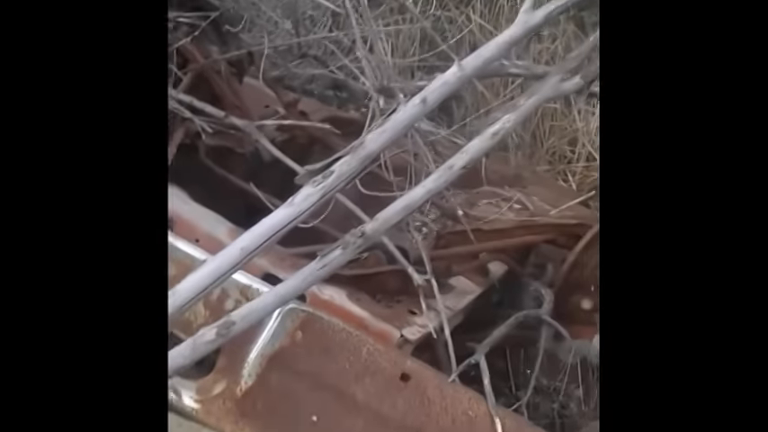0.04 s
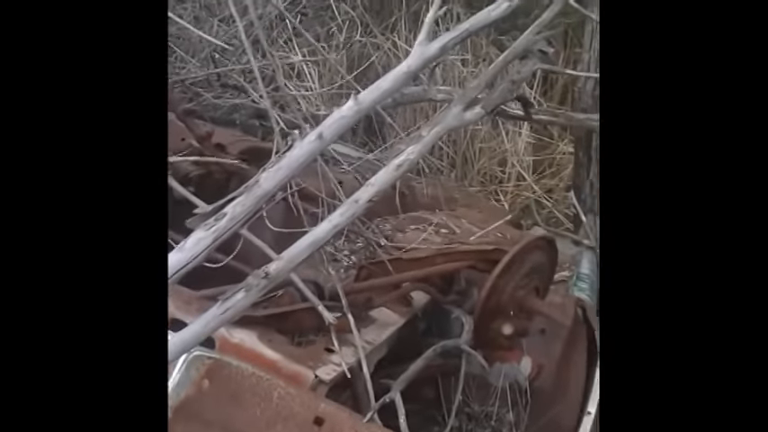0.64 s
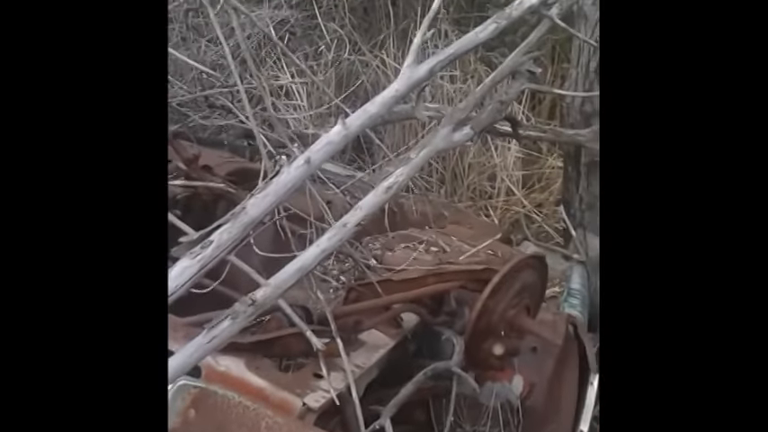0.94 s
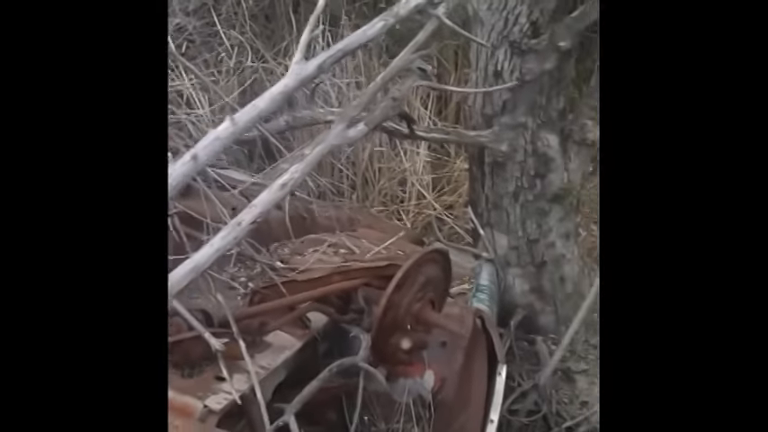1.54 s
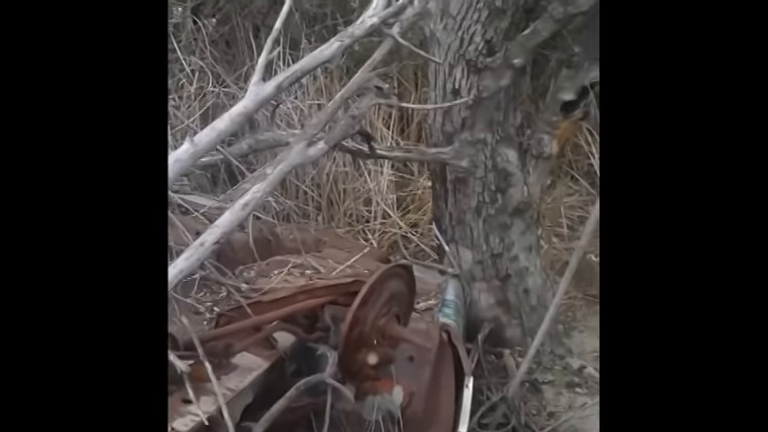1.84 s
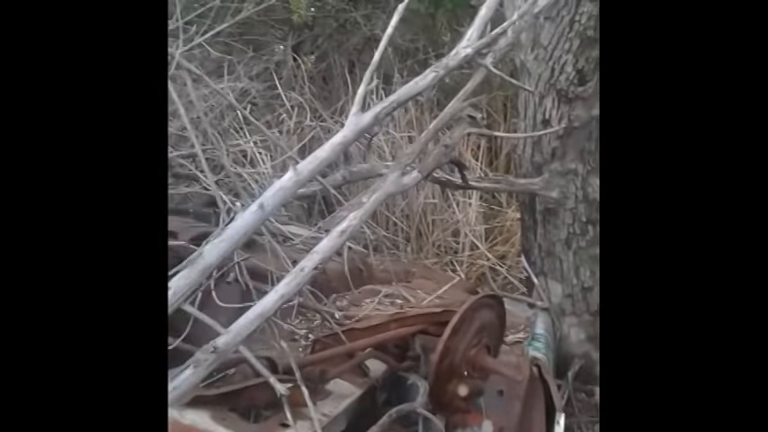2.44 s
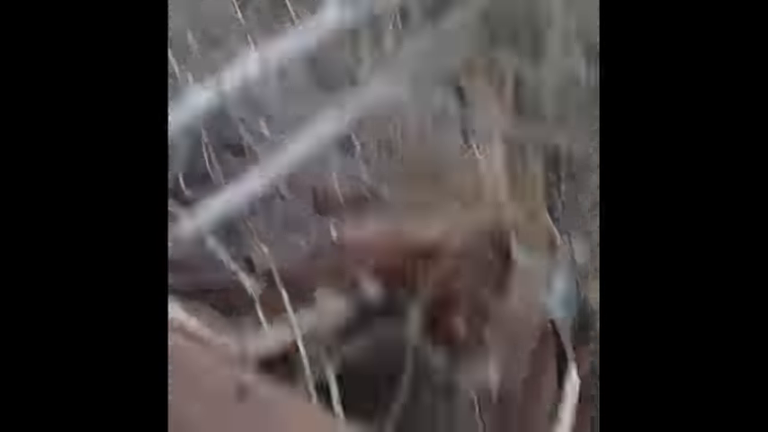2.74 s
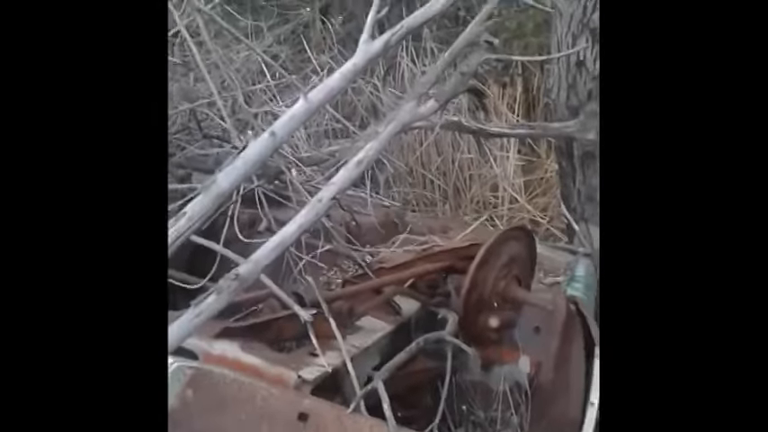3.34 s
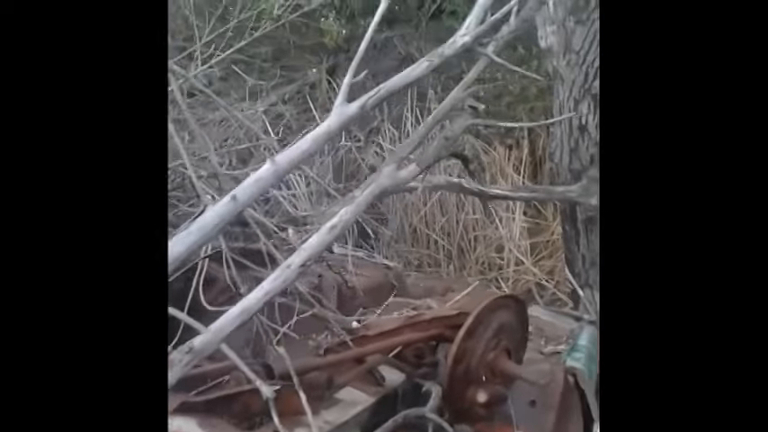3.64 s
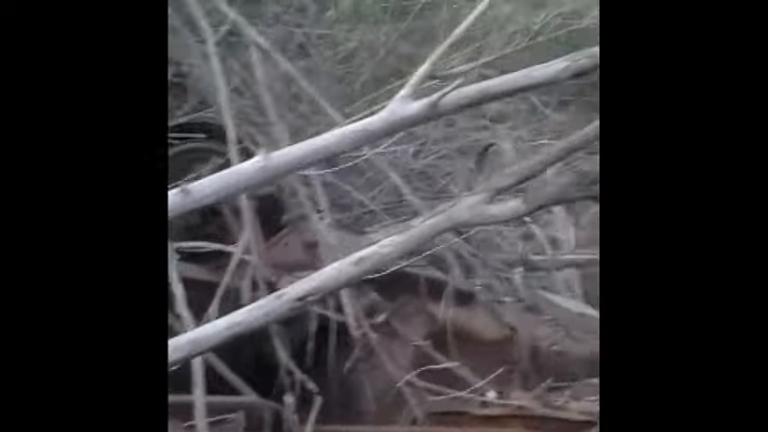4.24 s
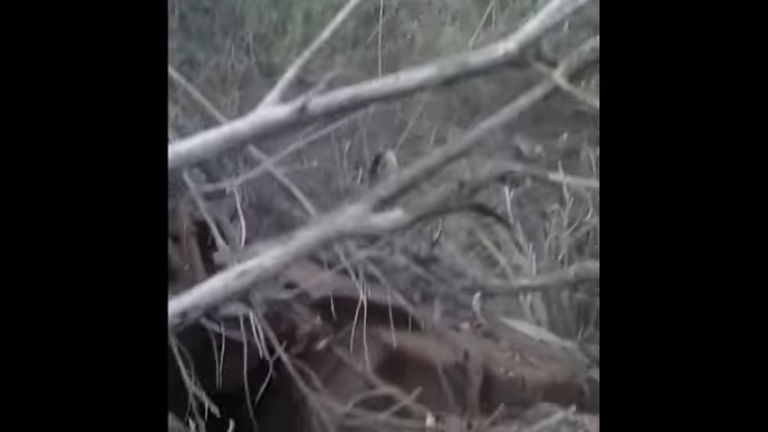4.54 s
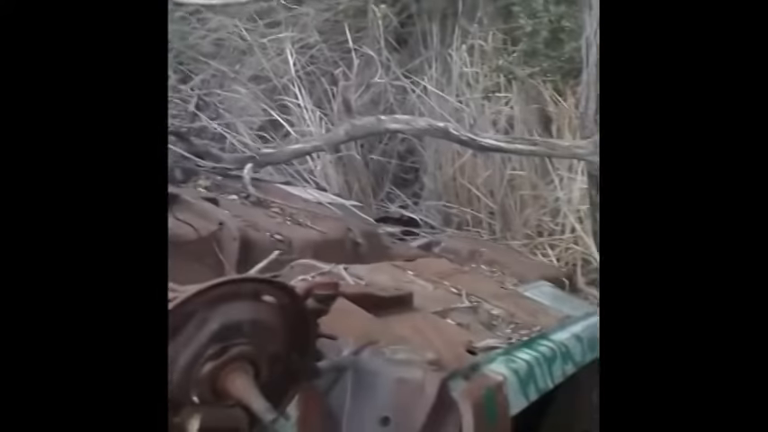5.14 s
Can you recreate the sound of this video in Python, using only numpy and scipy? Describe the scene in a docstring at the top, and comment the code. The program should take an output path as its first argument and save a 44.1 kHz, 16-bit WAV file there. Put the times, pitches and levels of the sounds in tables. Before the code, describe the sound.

Against a faint outdoor hush, careful footsteps stir dry stalks and click a few twigs. About two seconds in, forceful shoves through the brush bring surges of papery crackling, dull thuds and many sharp wooden snaps, close to the microphone and toward the left. Cloth then slides by up close, and the movement ends with a soft step and some small cracks.

```python
"""Someone with a small camera steps through dead brush beside a rusty wreck, in still outdoor air.
First come light swishes of dry stalks, soft footfalls, a few twigs and the faint slide of a sleeve.
From about 2.3 s the shoves grow hard, each swelling, holding and settling: stalks crackle, litter
crunches and twigs snap close by on the left, the loudest overloading the microphone. After 4.2 s
the sleeve hisses past the camera, and a last quiet step breaks a few thin twigs."""
import sys
import numpy as np
from scipy import signal
from scipy.fft import rfft, irfft
from scipy.io import wavfile

SR = 44100
rng = np.random.default_rng(int(sys.argv[2]) if len(sys.argv) > 2 else 0)


def put_to_file(sound):
    """Save the sound as 16-bit audio at rate SR, in the file named by the first command-line argument."""
    columns = np.atleast_2d(sound).T  # one column per channel
    safe = np.clip(columns, -1, 1)
    whole_steps = np.round(safe * 32767)
    wavfile.write(sys.argv[1], SR, whole_steps.astype(np.int16))


N = 237258
TIME = np.arange(N) / SR


def gain_of(db):
    """Decibels to gain."""
    return 10 ** (np.asarray(db) / 20)


def unit_rms(x):
    """Scales to rms 1."""
    return x / np.sqrt(np.mean(x ** 2) + 1e-20)


def curve_at(points, hz):
    """Reads a curve on a log-frequency axis."""
    f, value = np.transpose(points)
    return np.interp(np.log(hz + 1), np.log(f + 1), value)


def add(mix, start, sound):
    """Drops a stereo sound into the mix, start seconds in."""
    part = mix[:, max(round(start * SR), 0):][:, :sound.shape[1]]
    part += sound[:, :part.shape[1]]


def eq(x, points, size=2048):
    """Minimum-phase EQ: shapes the tone with no ringing ahead of an attack."""
    log_gain = np.log(gain_of(curve_at(points, abs(np.fft.fftfreq(size, 1 / SR)))))
    response = np.exp(np.conj(signal.hilbert(log_gain)))
    taps = np.fft.ifft(response).real[:size // 2]
    return signal.oaconvolve(x, taps[None], axes=1)[:, :x.shape[1]]


def resonate(x, hz, q):
    """One resonance with a peak gain of 1."""
    hz = min(hz, SR / 4)
    return signal.lfilter(*signal.iirpeak(hz, max(q, hz / (SR / 4)), fs=SR), x)


def stereo_noise(correlation, size):
    """White noise, wide at correlation 0 and mono at 1."""
    left, other = rng.standard_normal((2, size))
    shared = np.clip(correlation, -1, 1)
    right = irfft(shared * rfft(left) + np.sqrt(1 - shared ** 2) * rfft(other), size)
    return np.array([left, right])


def flicker(hz, depth_db):
    """A randomly wandering gain of rms 1."""
    knots = rng.standard_normal(N)
    return unit_rms(gain_of(depth_db * np.interp(TIME * hz, np.arange(N), knots)))


def gesture(start, rise_s, hold_s, fade_s):
    """Envelope of one movement: it builds, holds and dies away."""
    t = TIME - start
    attack = np.clip(t / rise_s, 0, 1)
    return attack * np.exp(-np.maximum(t - rise_s - hold_s, 0) / fade_s)


# Stereo image of diffuse sound: f/Hz, left-right correlation
DIFFUSE_IMAGE = [(50, 0.91), (150, 0.7), (500, 0.45), (1400, 0.043), (3000, 0.2), (15000, 0)]
def diffuse():
    """Noise from all sides: nearly mono in the bass, wide in the treble."""
    return stereo_noise(curve_at(DIFFUSE_IMAGE, np.fft.rfftfreq(N, 1 / SR)), N)


# Tone of the outdoor bed: f/Hz, level/dB
AIR_EQ = [(25, -7), (60, 11), (120, 4), (250, 1), (500, -3.5), (1000, -6), (2000, -6.5), (3300, -10.5),
          (4600, -5), (7000, -8.5), (10000, -8.5), (12500, -15.5)]
def air(level_db=-64):
    """The faint, even hush of a still day."""
    high_cut = signal.ellip(8, .5, 70, 13000, fs=SR, output="sos")
    hush = signal.sosfilt(high_cut, eq(diffuse(), AIR_EQ))
    return gain_of(level_db) * unit_rms(hush)


def crackle(per_s, spread_db, bands=16):
    """Countless tiny stalk fractures come in clumps, uneven in size and pitch."""
    out, t = np.zeros((2, N)), np.arange(256) / SR
    chance = per_s / bands / SR * flicker(hz=54.6, depth_db=2.5) ** 2
    for hz in np.geomspace(2200, 11000, bands):
        sizes = gain_of(spread_db * np.minimum(rng.exponential(1, N), 3.5))
        clicks = sizes * (rng.random(N) < chance)
        tear = stereo_noise(0.1, len(t)) * np.exp(-t / 0.0015)
        grain = unit_rms(resonate(tear, hz, q=3.5) + .15 * tear) * np.sqrt(hz)
        out += signal.oaconvolve(clicks[None], grain, axes=1)[:, :N]
    return unit_rms(out)


# Bright, papery tone of dry stalks: f/Hz, level/dB
STALK_EQ = [(200, -18), (700, -4), (1200, -5), (2000, -5.5), (3200, -2.5), (5000, -1), (7500, 3.5),
            (9500, -2.5), (12000, -2.5), (14500, -12)]
def crunch(per_s, spread_db, hiss_db):
    """Fracturing stalks layered with the hiss of their rubbing, at rms 1."""
    grains = unit_rms(eq(crackle(per_s, spread_db), STALK_EQ))
    hiss = unit_rms(eq(stereo_noise(0.233, N), STALK_EQ)) * flicker(hz=127.6, depth_db=2.0)
    return unit_rms(grains + gain_of(hiss_db) * hiss)


# Tufts crushed or whipping back: t/s, level/dB (before trim), swell/s, decay/s, f/Hz
SWISH_CUES = [(0.153, -48, 0.0052, 0.018, 5370), (0.5, -29.5, 0.0087, 0.026, 7800),
              (1.256, -42, 0.0066, 0.017, 6300), (2.274, -51, 0.042, 0.02, 4440),
              (2.733, -20, 0.0093, 0.016, 7200), (2.753, -19, 0.00098, 0.037, 1050),
              (3.232, -22.5, 0.009, 0.023, 8100), (3.808, -17.5, 0.02, 0.017, 5100),
              (3.857, -32, 0.0019, 0.041, 2500), (3.984, -25, 0.018, 0.055, 5770),
              (4.118, -24.5, 0.0043, 0.026, 5800), (4.416, -31.5, 0.016, 0.096, 7050)]
def swishes(trim_db=-1.0):
    """A whole tuft gives way at once in a dense crunch that swells, dies and stops."""
    out, t = np.zeros((2, N)), np.arange(SR // 4) / SR
    dense = crunch(per_s=2900, spread_db=2, hiss_db=5)
    for start, db, swell, decay, hz in SWISH_CUES:
        tuft = dense[:, round(start * SR):][:, :len(t)]
        tuft = unit_rms(resonate(tuft, hz, q=3.1) + 0.62 * tuft)
        attack = np.minimum(t / swell, 1)
        release = np.exp(-t / decay - (t / (2.6 * decay)) ** 4)
        add(out, start, gain_of(db + trim_db) * tuft * attack * release)
    return out


# Footfalls and heavy sticks knocking on the ground: t/s, level/dB, f/Hz, swell/ms
THUD_CUES = [ (.16, -48.5, 675, 1.1), (.501, -53.5, 397, 2.6), (2.05, -51.5, 534, 4.2),
             (2.276, -36, 170.5, 5.3), (2.458, -27.5, 615, 3), (2.485, -37, 166, 4.5), (2.711, -44, 318, 5),
             (2.7596, -14, 487, 1.93), (2.772, -31.5, 382, 4.7), (2.822, -38, 165.7, 22.5),
             (3.178, -41, 477, 4.7), (3.197, -31, 767, 2.5), (3.249, -47.5, 262, 13),
             (3.304, -38.5, 162, 7.9), (3.5715, -38, 980, 1.84), (3.798, -39, 477, 3.3),
             (3.818, -30, 382, 3.3), (3.86, -25, 246, 2.6), (4.081, -27.5, 153.6, 4.6),
             (4.12, -39, 288, 10.4), (4.532, -30.5, 866, 2.1), (4.743, -34.5, 820, 5.1),
             (5.203, -40.5, 227, 3.6), (5.294, -52.5, 667, 6.44)]
def thuds(soft_hz=164, size=4096):
    """Soft ground answers each blow with a few damped cycles and a slightly higher scuff."""
    out, t = np.zeros((2, N)), np.arange(size) / SR
    for start, db, hz, swell_ms in THUD_CUES:
        age = t * 1000 / swell_ms
        force = age * np.exp(1 - age)
        bump_share = np.clip(0.56 * (soft_hz / hz) ** 0.78, 0, 1)  # high blows are mostly scuff
        bump = np.sqrt(2 * bump_share) * np.sin(2 * np.pi * hz * t)
        scuff = resonate(stereo_noise(0.85, size), 1.1 * hz, q=0.75)
        scuff = unit_rms(resonate(scuff, 1.1 * hz, q=0.75))
        blow = force * (bump + np.sqrt(1 - bump_share) * scuff)
        add(out, start, gain_of(db) * blow * np.linalg.norm(force) / np.linalg.norm(blow[0]))
    return out


# Tone of cracking wood: f/Hz, level/dB
WOOD_EQ = [(100, -10.5), (400, 5), (1000, 4.5), (1800, 4), (3000, 0), (5000, -0.5), (8000, 3), (11000, 0),
           (15000, 0.5)]
# Bending modes of a stick: multiple of its pitch, Q, level/dB
STICK_MODES = [(0.654, 10, -4), (1.069, 11, 5), (1.53, 22, -2)]
def snap(db, hz, tear_ms, trim_db=2.0, thick_hz=5400, thin_span_hz=1980, size=2048):
    """Fibres tear in a burst lasting milliseconds and set the stick's bending modes ringing."""
    t_ms = np.arange(size) / SR * 1000
    fade = np.exp(-t_ms / tear_ms)
    tear = stereo_noise(0.76, size) * (fade + 0.039 * np.exp(-t_ms / 7.1))
    ring = sum(gain_of(mode_db) * resonate(tear, hz * ratio, q) for ratio, q, mode_db in STICK_MODES)
    crack = resonate(tear, hz, q=2.34) + ring + 0.1 * tear
    thinness = np.clip((hz - thick_hz) / thin_span_hz, 0, 1)  # thin twigs click on one narrow band
    crack = eq(crack + 0.59 * thinness * resonate(crack, hz, q=9.9), WOOD_EQ)
    return gain_of(db + trim_db) * crack * np.linalg.norm(fade) / np.linalg.norm(crack[0])


# Breaking twigs: t/s, level/dB (before trim), f/Hz, tear/ms
TWIG_CUES = [ (.2469, -42, 7000, 0.52), (0.4432, -38, 6940, 1.3), (0.8686, -31, 7600, 0.84),
             (1.05, -55, 3640, 2.4), (1.178, -48, 5800, 2.4), (1.2719, -38.5, 6100, 1.2),
             (1.3998, -46, 4800, 1.5), (1.412, -43, 7800, 1.7), (1.8578, -36, 7060, 0.28),
             (1.9106, -36, 5760, .9), (1.952, -23.5, 7260, 0.61), (2.1977, -43, 4500, 1),
             (2.3013, -19, 2150, 1.9), (2.3022, -15.5, 3600, 1.1), (2.3887, -15, 7350, 0.79),
             (2.4039, -14.5, 7300, 0.39), (2.4153, -11.5, 7200, 0.29), (2.4562, -4.5, 5070, 2.24),
             (2.458, -11.5, 2990, 2.1), (2.574, -19, 7300, 1.2), (2.6115, -10, 7140, 0.54),
             (2.636, -19, 6850, 0.94), (2.7108, -18, 5450, 1.4), (2.7173, -24, 5700, 1.5),
             (2.7346, -7.5, 7130, 0.88), (2.7518, -4, 6640, 0.98), (2.7599, -10, 890, 1),
             (2.788, -22.5, 3070, 8.3), (3.022, -35, 5550, 1.8), (3.166, -35, 3020, 2.6),
             (3.197, -9.5, 4870, 2.7), (3.2015, -12.5, 3260, 0.76), (3.244, -18.5, 8400, 0.9),
             (3.258, -19.5, 8100, 1.5), (3.364, -26.5, 7240, 0.47), (3.5718, -15, 7400, 1.17),
             (3.5985, -38.5, 3000, 1.6), (3.798, -41, 3430, 11), (3.8172, -24.5, 2310, 6.7),
             (3.822, -17, 7550, 2.9), (3.8262, -8.5, 7000, 1.3), (3.8324, -12.5, 4900, 0.48),
             (3.8561, -14.5, 4100, 3.4), (3.857, -18, 1670, 1.2), (3.8816, -16.5, 1145, 1.54),
             (4.029, -26.5, 4870, 1.7), (4.1204, -16.5, 6070, .75), (4.2552, -21, 5700, 1.7),
             (4.425, -11, 9700, 0.29), (4.4698, -21.5, 5000, 2), (4.5817, -4, 6440, 1.4),
             (5.2412, -53, 6600, 0.52), (5.3143, -35.5, 6950, 0.61), (5.3563, -28, 7400, 1.7),
             (5.3668, -31, 7300, 1.4)]
def twigs():
    """The foreground cracks: thick sticks break low, thin twigs high."""
    out = np.zeros((2, N))
    for start, db, hz, tear_ms in TWIG_CUES:
        add(out, start, snap(db, hz, tear_ms))
    return out


# Tone of the cloth at the left and right microphones: f/Hz, level/dB
CLOTH_LEFT_EQ = [(60, -6), (250, -5), (900, -11.5), (1800, -8.5), (2700, -3), (3900, -7), (4600, -1),
                 (5800, -2), (6550, 3.5), (7300, -7), (10000, -5.5), (14500, -16)]
CLOTH_RIGHT_EQ = [(60, -2), (250, -3), (900, -4.5), (2100, -10), (2650, 0), (3500, -2.5), (4150, 3.5),
                  (4550, 11.5), (5700, -7), (6400, 2.5), (7200, -6), (14500, -19)]
# Sleeve passes: t/s, hold/s, level/dB
SLEEVE_CUES = [(.3, 0.84, -69.5), (4.25, 0.087, -45), (4.36, 0.2, -41.5), (4.648, 0.23, -37.5)]
def sleeve(rise_s=0.041, fade_s=0.031):
    """Cloth slides close to the camera, hissing in a few narrow resonances."""
    rub = diffuse() * flicker(hz=90.7, depth_db=1.5)
    cloth = np.vstack([eq(rub[:1], CLOTH_LEFT_EQ), eq(rub[1:], CLOTH_RIGHT_EQ)])
    passes = sum(gain_of(db) * gesture(start, rise_s, hold, fade_s) for start, hold, db in SLEEVE_CUES)
    return unit_rms(cloth) * passes


# Steps into the brush: t/s, rise/s, hold/s, settle/s, stalk level/dB, litter level/dB (before trims)
SHOVE_CUES = [ (.4, 0.11, 0.026, 0.032, -58, -59.5), (1.889, 0.01, 0.015, 0.18, -55, -59),
              (1.98, 0.21, 0.027, 0.045, -57, -59), (2.252, 0.027, 0.046, 0.18, -38.5, -47.5),
              (2.455, 0.052, 0.034, 0.23, -41.5, -44), (2.69, 0.064, 0.086, 0.093, -35, -37.5),
              (2.98, 0.029, 0.0067, 0.12, -49, -85), (3.158, 0.019, 0.05, 0.23, -47.5, -47),
              (3.811, 0.049, 0.023, 0.021, -42, -39), (3.945, 0.015, 0.095, 0.093, -41, -43.5),
              (4.108, 0.0084, 0.086, 0.13, -38, -47), (4.37, 0.051, 0.084, 0.014, -39, -47.5),
              (4.51, 0.037, .02, 0.075, -59, -42.5), (4.7, .06, 0.012, 0.12, -63, -42),
              (4.98, 0.21, 0.14, 0.029, -50, -59), (5.21, 0.025, 0.029, 0.021, -49, -59.5)]
def shoves():
    """Two fader rides summed over all shoves: the push on the stalks and the weight on the litter."""
    return sum(gain_of([[stalks_db], [litter_db]]) * gesture(start, rise, hold, settle)
               for start, rise, hold, settle, stalks_db, litter_db in SHOVE_CUES)


def stalks(push, trim_db=1.6):
    """Dry stalks crackle against each other as hard as they are pushed."""
    return gain_of(trim_db) * push * crunch(per_s=1200, spread_db=5.2, hiss_db=-3)


# Dark tone of the ground underfoot: f/Hz, level/dB
LITTER_EQ = [(30, -26), (95, -4), (160, -4.5), (300, -4), (500, -10.5), (800, -12.5), (1300, -8.5),
             (2500, -10.5), (6000, -66.5)]
def litter(weight, trim_db=-2):
    """Leaf litter and soil crunch dully under the walker's weight."""
    leaves = unit_rms(eq(stereo_noise(0.83, N), LITTER_EQ)) * flicker(hz=64.57, depth_db=4.0)
    return gain_of(trim_db) * leaves * weight


def splinters(push, per_s=30, spread_db=5.5, range_hz=(4050, 7800)):
    """Small twigs break at random moments, as loudly as the brush is pushed."""
    out = np.zeros((2, N))
    for when, size, pitch in rng.random((int(per_s * N / SR), 3)):
        at = int(when * N)
        db = 4 + spread_db * (2 * size - 1)
        hz = np.interp(pitch, [0, 1], range_hz)
        add(out, at / SR, push[at] * snap(db, hz, tear_ms=0.48))
    return out


def thicket(x, near_db, near_s, far_db, far_s):
    """Nearby metal and trunks scatter the sound at once; the wood beyond adds a faint tail."""
    t = np.arange(SR // 2) / SR
    near = rng.standard_normal((2, len(t))) * np.exp(-t / near_s) * (t > .0025)
    far = rng.standard_normal((2, len(t))) * np.exp(-t / far_s) * (t > .012)
    early = gain_of(near_db) * near / np.linalg.norm(near[0])
    tail = gain_of(far_db) * far / np.linalg.norm(far[0])
    return x + signal.fftconvolve(x, early + tail, axes=1)[:, :N]


# Shading of the right microphone, which faces away from the brush: f/Hz, level/dB against the left
OFF_AXIS_EQ = [(100, 0), (1000, -1), (2500, -0.5), (4200, 3), (5400, 2.5), (6500, -15), (8000, -13.5),
               (12000, -8.5), (15000, -24.5)]
def place_left(brush, lag_samples=13):
    """The brush reaches the right microphone slightly later and duller than the left."""
    right = np.roll(eq(brush[1:], OFF_AXIS_EQ), lag_samples, axis=1)
    return np.vstack([brush[:1], right])


def scene():
    """The mix: hits with reverb and dry rustle to the left, the sleeve up close, air underneath."""
    push, weight = shoves()
    hits = twigs() + thuds() + splinters(push)
    hits = thicket(hits, near_db=-12, near_s=0.0048, far_db=-21.5, far_s=0.2)
    brush = hits + stalks(push) + swishes() + litter(weight)
    return place_left(brush) + sleeve() + air()


def record(dry, high_cut_hz=14600):
    """The loudest cracks overload and flatten; a steep high cut follows."""
    overloaded = np.clip(dry, -1, 1)
    high_cut = signal.firwin(127, high_cut_hz, window=("kaiser", 7), fs=SR)
    return signal.oaconvolve(overloaded, high_cut[None], "same")


dry = scene()
out = record(dry)
put_to_file(out)
```